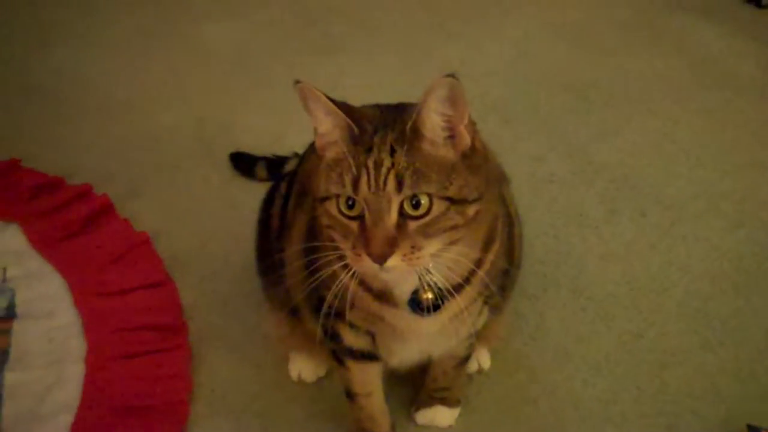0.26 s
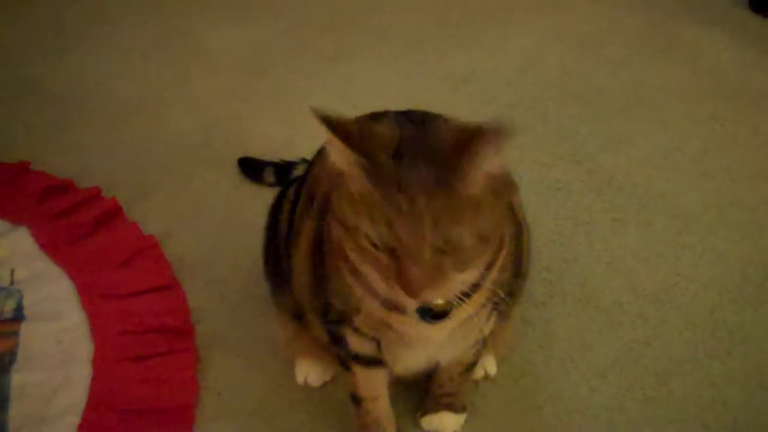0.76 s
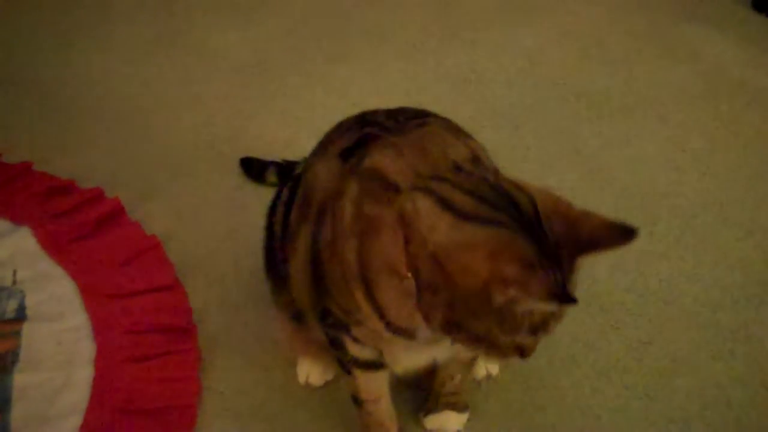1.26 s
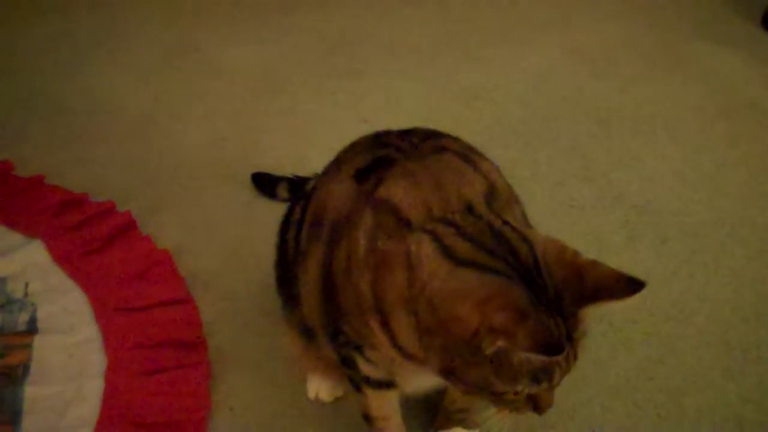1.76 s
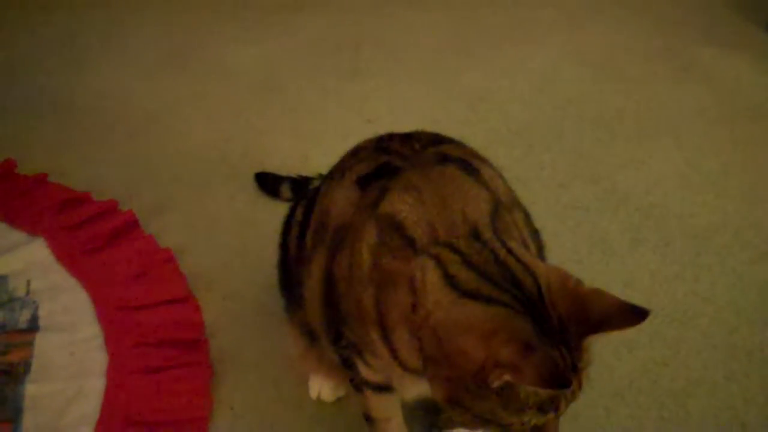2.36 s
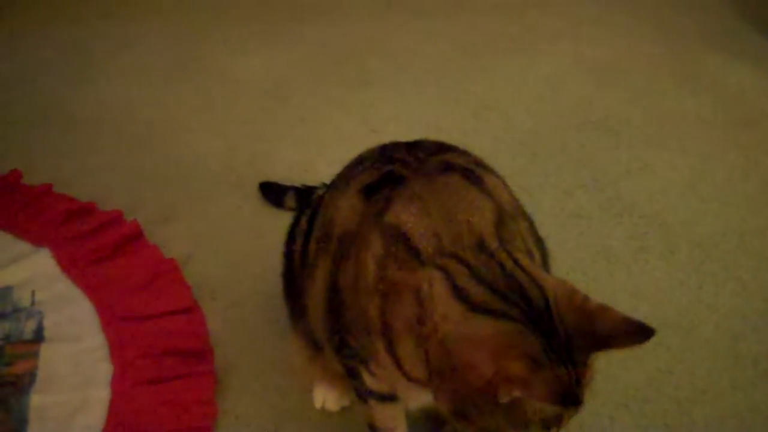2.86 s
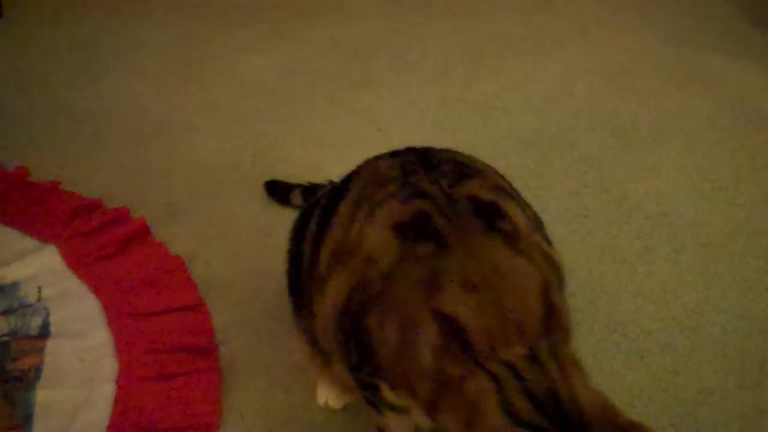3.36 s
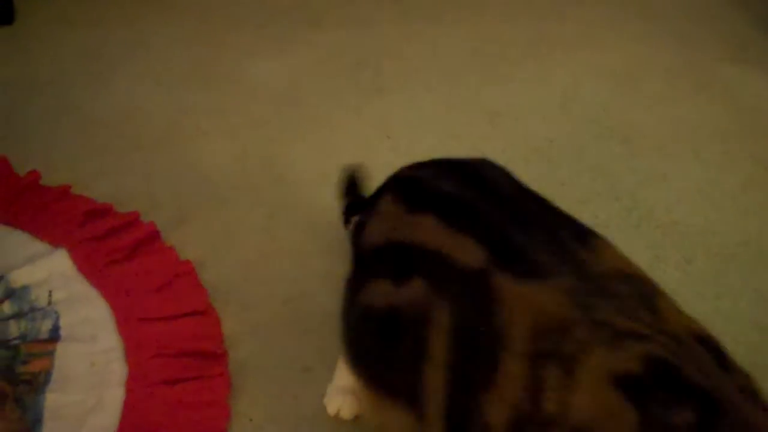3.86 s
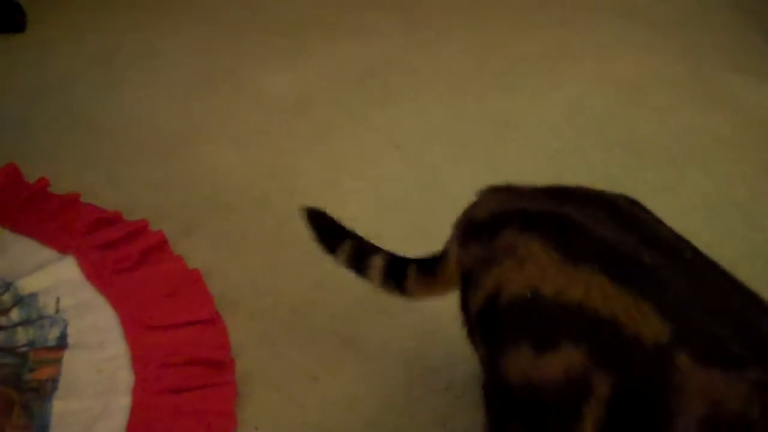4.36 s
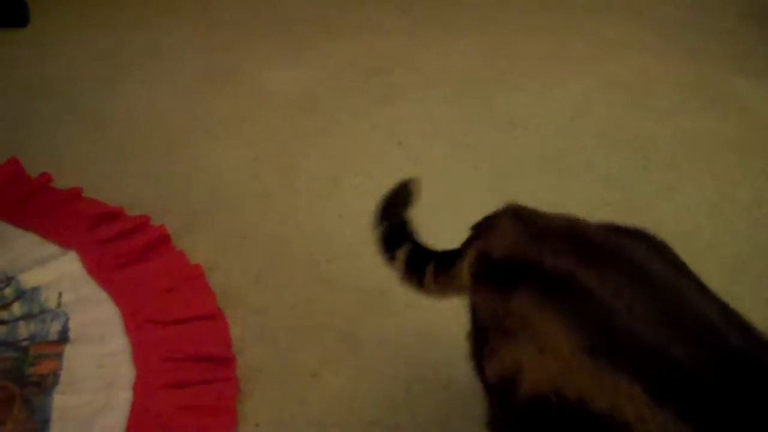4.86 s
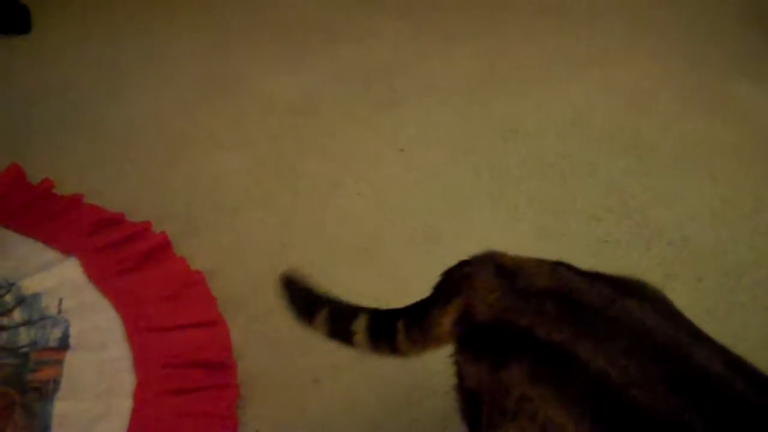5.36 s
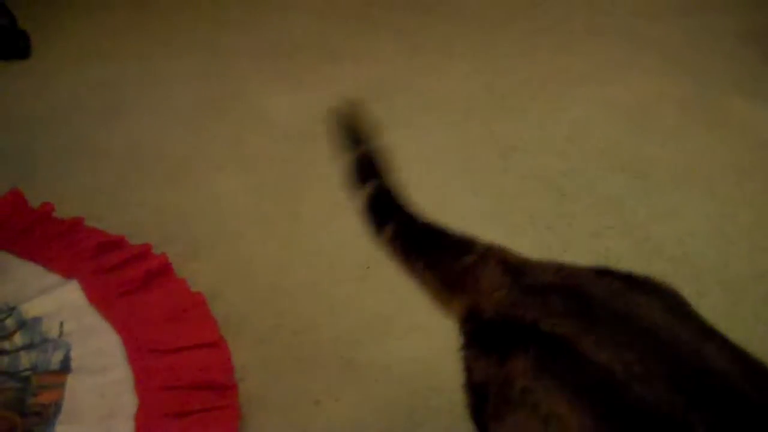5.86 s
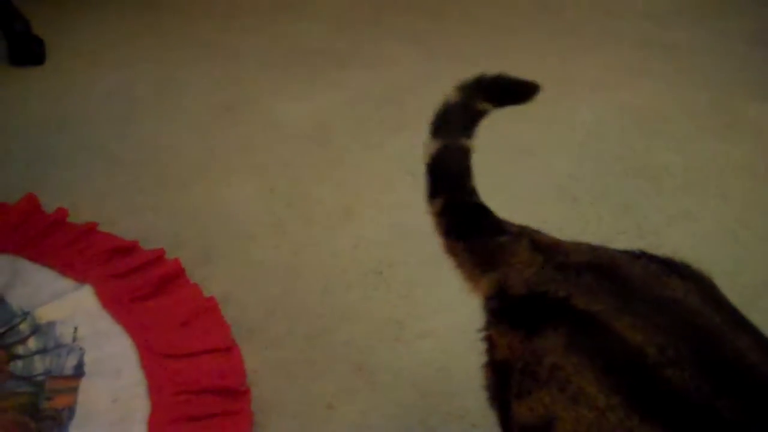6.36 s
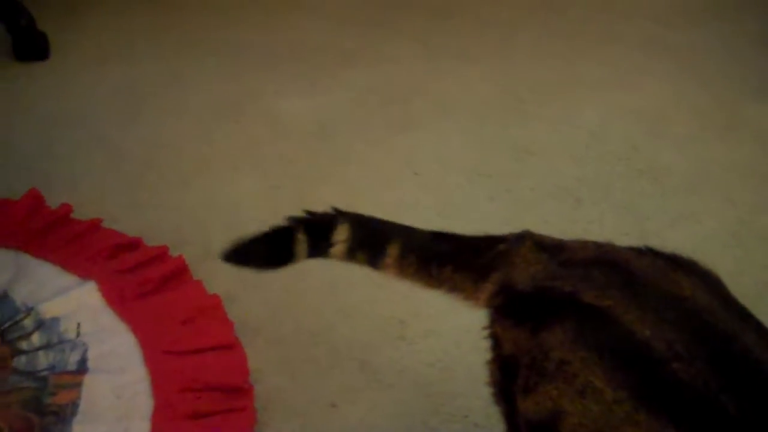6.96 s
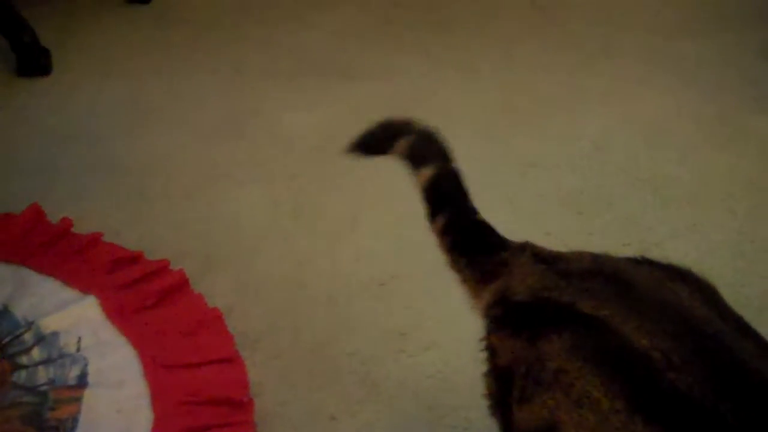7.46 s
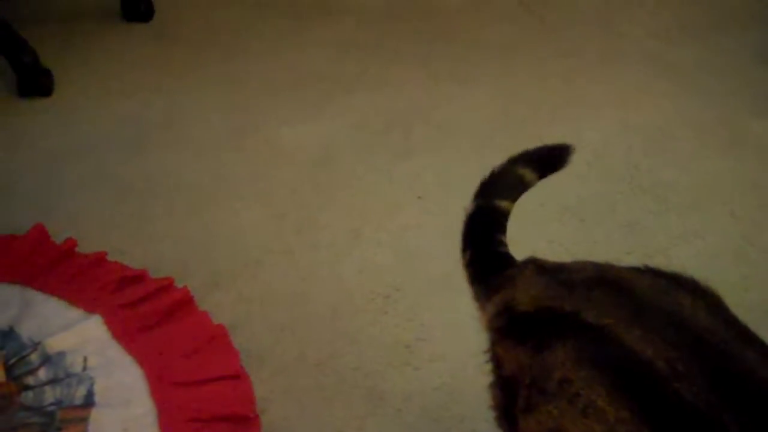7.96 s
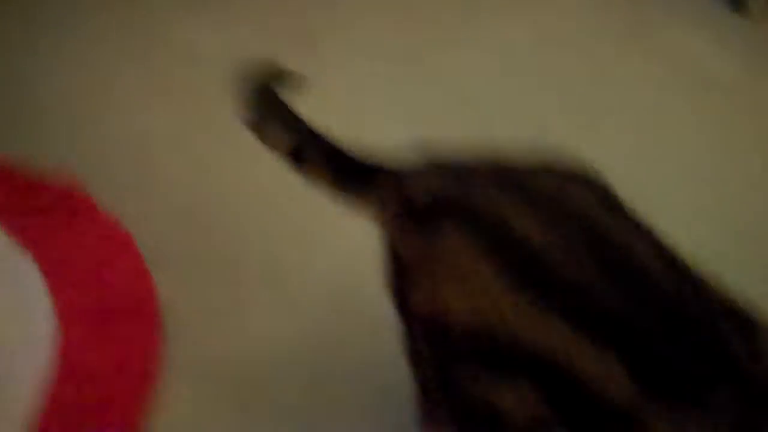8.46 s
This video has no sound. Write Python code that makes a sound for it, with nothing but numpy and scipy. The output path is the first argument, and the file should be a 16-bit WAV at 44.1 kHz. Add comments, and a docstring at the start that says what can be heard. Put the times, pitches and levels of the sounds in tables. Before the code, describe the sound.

A cat noses and paws at wrapping paper on a living-room carpet. Thin, sharp crackles come in irregular clusters over a soft sliding rustle, mixed with very short rips and a few light knocks on a cardboard box. The crackling is loudest a little before the middle and thins out at the end. The paper is close and to the left of the microphone, over faint hiss and hum.

```python
"""Cat in wrapping paper

A cat noses and paws at wrapping paper on a living-room carpet, just left of a small camera.
Creases buckle and snap over a sliding rustle and short rips; paws knock a cardboard box; the carpet
gives dull rubs. The room answers briefly over room tone, hiss and mains hum. Each of the two
microphone ports has its own resonance; the loudest snaps clip."""
import sys
import numpy as np
from scipy import signal
from scipy.fft import rfft, irfft
from scipy.io import wavfile

SR = 44100
rng = np.random.default_rng(int(sys.argv[2]) if len(sys.argv) > 2 else 0)


def master_out(mix):
    """Clip the mix to full scale and print it as 16-bit PCM to the path in sys.argv[1]."""
    frames = np.transpose(np.atleast_2d(mix))
    ceiling = np.clip(frames, -1, 1)
    pcm = np.round(ceiling * 32767).astype(np.int16)
    wavfile.write(sys.argv[1], SR, pcm)


N = 383669
TIME_S = np.arange(N) / SR
PAN_DB = 14  # left minus right


def undb(db):
    """dB to gain."""
    return 10 ** (np.asarray(db) / 20)


def unit(x):
    """Scale to rms 1."""
    return x / np.sqrt(np.mean(x ** 2))


def peak(x):
    """Largest magnitude of each row."""
    return np.abs(x).max(axis=-1, keepdims=True)


def band(x, lo_hz, hi_hz):
    """Band-pass, 12 dB/octave each side."""
    return signal.sosfilt(signal.butter(2, [lo_hz, hi_hz], "bandpass", fs=SR, output="sos"), x)


def lowpass(x, hz, order=2):
    """Gentle treble roll-off."""
    return signal.lfilter(*signal.butter(order, hz, fs=SR), x)


def top_cut(x, hz):
    """Steep low-pass."""
    return signal.sosfilt(signal.ellip(10, .2, 80, hz, fs=SR, output="sos"), x)


def ring(hz, t60_s, size=SR // 8):
    """One damped mode."""
    t = np.arange(size) / SR
    return np.sin(2 * np.pi * hz * t) * np.exp(-np.log(1000) * t / t60_s)


def add(track, start_s, sound):
    """Mix a sound into the track."""
    i = int(start_s * SR)
    track[..., i:i + sound.shape[-1]] += sound[..., :N - i]


def colour(noise, points):
    """Filter by (frequency [Hz], gain [dB]) points."""
    hz, db = np.transpose(points)
    bins_hz = np.fft.rfftfreq(N, 1 / SR) + 1
    return irfft(rfft(noise) * undb(np.interp(np.log(bins_hz), np.log(hz), db)), N)


# Port resonances, left then right: (frequency [Hz], Q)
PORTS = [(7790, 5.25), (6240, 6.2)]


def port(x, hz, q):
    """Hole in front of a capsule: flat bass, a resonance, falling treble."""
    w = 2 * SR * np.tan(np.pi * hz / SR)
    return signal.lfilter(*signal.bilinear([w * w], [1, w / q, w * w], SR), x)


# Hum partials: (frequency [Hz], level [dB])
HUM_PARTIALS = [(120, -66.5), (961, -75.5)]
# Hum envelope: (time [s], gain [dB])
HUM_SAG = [(0, 1), (1.4, -1), (2.2, -3.5), (2.7, -7), (3.8, -13), (5.1, -6.5), (5.6, -3.5), (6.4, -1.5),
           (8.7, 1.5)]


def hum():
    """Mains hum; the level sags and returns."""
    tones = sum(np.sqrt(2) * undb(db) * np.sin(2 * np.pi * hz * TIME_S) for hz, db in HUM_PARTIALS)
    return tones * undb(np.interp(TIME_S, *np.transpose(HUM_SAG)))


# Noise floor spectrum: (frequency [Hz], relative density [dB])
AIR_SPECTRUM = [(15, -38), (25, 4.5), (70, -1), (122, -1), (168, 1.5), (330, -1.5), (599, -3.5),
                (741, -5.5), (966, -3.5), (1130, -6), (2640, -14), (5840, -13), (7420, -19), (14000, -18.5)]
# Noise floor balance: (frequency [Hz], left minus right [dB])
AIR_BALANCE = [(60, 1), (110, 5.5), (200, 6.5), (370, 8.0), (680, 7.5), (1260, 6), (2310, -0.5), (4250, -1),
               (7810, 1), (14400, 2)]
# Port coherence: (frequency [Hz], common power [0-1])
AIR_COHERENCE = [(40, 0.058), (130, 0.5), (500, 0.54), (1500, 0.21), (4000, 0.022)]


def air(noise_db=-58):
    """Room tone and capsule hiss, partly common to both sides, plus the hum."""
    common, *own = rng.standard_normal((3, N))
    hz, share = np.transpose(AIR_COHERENCE)
    alike = colour(common, np.transpose([hz, 10 * np.log10(share)]))
    apart = colour(np.array(own), np.transpose([hz, 10 * np.log10(1 - share)]))
    floor = unit(colour(alike + apart, AIR_SPECTRUM)) * undb(noise_db) + hum()
    return np.array([colour(x, np.multiply(AIR_BALANCE, [1, side])) for x, side in zip(floor, (.5, -.5))])


def grains(rate_per_s, spread_db):
    """Tiny creases of random size and timing, as a fine and a coarse band."""
    hits = rng.random(N) < rate_per_s / SR
    clicks = hits * rng.standard_normal(N)
    clicks *= undb(spread_db * np.minimum(rng.exponential(1, N), 5.5))
    fine = band(clicks, 4800, 19000)
    coarse = band(np.roll(clicks, N // 2), 1570, 5670)
    return fine / np.std(port(fine, *PORTS[0])), unit(coarse)


# Sliding paper: (time [s], fine level [dB], coarse level [dB])
RUSTLE = [(0, -42.5, -55.5), (.12, -37.5, -50), (.2, -40.5, -52), (.25, -60, -64), (.31, -41, -53.5),
          (.42, -38, -54), (.65, -33.5, -54), (.8, -47, -59.5), (.92, -40, -54.5), (1.15, -37.5, -49),
          (1.3, -43, -57), (1.36, -39.5, -57), (1.41, -35.5, -51.5), (1.44, -41, -55), (1.46, -49, -77),
          (1.52, -35, -48), (1.6, -50, -56), (1.7, -52.5, -60.5), (2.0, -38.5, -49), (2.13, -27, -42),
          (2.35, -42.5, -53.5), (2.7, -41.5, -51.5), (2.92, -56, -61.5), (3.05, -47, -56),
          (3.4, -48, -63.5), (3.5, -37, -51), (3.68, -51, -53.5), (3.9, -37.5, -52), (4.02, -40, -47.5),
          (4.2, -35, -46.5), (4.4, -42, -50), (4.63, -56, -58), (4.82, -52, -54.5), (4.93, -41.5, -54),
          (5.0, -38.5, -50.5), (5.04, -41.5, -54), (5.13, -49.5, -58), (5.3, -48, -50), (5.41, -47, -63),
          (5.46, -41.5, -55), (5.5, -49, -60), (5.54, -36.5, -52), (5.6, -37.5, -47), (5.7, -38.5, -51),
          (5.85, -46.5, -60.5), (6.12, -55.5, -63), (6.5, -51, -61), (6.62, -36.5, -55.5), (6.8, -55, -60),
          (6.9, -42, -48.5), (7.02, -52.5, -60), (7.07, -49, -59), (7.09, -43.5, -51.5),
          (7.15, -43.5, -51.5), (7.2, -40.5, -47.5), (7.245, -35.5, -50.5), (7.27, -47, -61),
          (7.33, -48.5, -63), (7.5, -37, -49.5), (7.72, -51, -62), (8.3, -52, -60.5), (8.5, -55, -61),
          (8.6, -52.5, -58), (8.7, -47, -58)]


def rustle(flicker_db=1.95, crackle_db=-12):
    """Paper slides on paper: dense creases fuse into a flickering hiss under sparse crackles."""
    time_s, fine_db, coarse_db = np.transpose(RUSTLE)
    fine, coarse = grains(rate_per_s=9000, spread_db=1.5)
    fine_crackle, coarse_crackle = grains(rate_per_s=500, spread_db=3)
    fine = 0.56 * (fine + undb(crackle_db) * fine_crackle) * undb(np.interp(TIME_S, time_s, fine_db))
    coarse = 0.74 * (coarse + undb(crackle_db) * coarse_crackle)
    coarse *= undb(np.interp(TIME_S, time_s, coarse_db))
    flicker = unit(band(rng.standard_normal(N), 1.3, 41))
    return (fine + coarse) * undb(flicker_db * flicker)


def crack(noise, t_ms, decay_ms, level_db):
    """Burst of tiny cracks, the first hardest; short bursts are sharp, long ones mid-treble."""
    envelope = np.exp(-(t_ms / np.maximum(decay_ms, .03)) ** (1 + 0.43 * decay_ms))
    burst = band((noise + 2.44 * (t_ms == 0)) * envelope, 5020, 21700)
    smooth = np.clip(decay_ms, 0, 1)
    burst = (1 - smooth) * burst + smooth * band(burst, 5500, 11400)
    burst += undb(-6) * (1 - smooth) * band(burst, 11800, 22000)
    return burst * undb(level_db) / peak(port(burst, *PORTS[0]))


def sheet_ring(hz, size, t60_cycles=13):
    """Three modes of a paper patch, spaced by its shape; a small patch radiates little bass."""
    lower_hz = 0.58 * hz * np.exp(0.15 * rng.standard_normal(hz.shape))
    upper_hz = 1.45 * hz * np.exp(0.24 * rng.standard_normal(hz.shape))
    t60_s = t60_cycles / hz
    modes = ring(hz, t60_s, size) - undb(-7.5) * ring(lower_hz, t60_s, size)
    modes += undb(-8.5) * ring(upper_hz, t60_s, size)
    return band(modes, 740, 9400)


# Buckling creases:
# (time [s], crack level [dB], ring pitch [Hz], ring level [dB], flap level [dB], crack decay [ms])
SNAPS = [(0.1049, -3, 4950, -47, -35, 0.23), (0.382, -13.5, 3450.0, -43, -47, 0.048),
         (0.423, -13, 3900.0, -22, -44, 0.21), (0.4368, -4, 3440, -22, -46, 0.22),
         (0.475, -10, 3660.0, -39, -52, 0.37), (0.4823, -14, 5240, -11, -46, 0.081),
         (0.5364, -2.5, 4170, -13, -50, 0.16), (0.5408, -1.5, 4290.0, -32, -34, 0.065),
         (0.548, -16, 4800, -37, -53, 0.22), (0.5673, -9.5, 2760.0, -31, -29, 0.21),
         (0.695, -14, 5190.0, -23, -50, 0.12), (0.7096, -14.5, 3680, -29, -49, 0.19),
         (0.9392, -8.5, 3300, -25, -50, 0.5), (1.0792, -9, 4170, -25, -48, 0.45),
         (1.091, -14, 5080.0, -31, -54, 0.43), (1.0988, -9.5, 5030, -13.5, -50, 0.075),
         (1.1339, -12, 4840, -16.5, -54, 0.18), (1.144, -8, 5060.0, -34.0, -53.0, 0.12),
         (1.214, -12.5, 3520, -17.5, -41, 0.19), (1.231, -14, 3080.0, -41, -54.0, 0.2),
         (1.283, -14.5, 3200, -23.5, -42, 0.55), (1.527, -7.5, 4330.0, -46, -57, 0.07),
         (1.584, -14.5, 3830, -31, -33, 0.31), (1.8293, -8, 3800, -22.5, -42, 0.092),
         (1.8494, -15, 5000, -25, -38.5, 0.16), (2.0966, 3.5, 3200, -12, -31, 0.021),
         (2.2036, -12, 2880, -20, -29, 0.24), (2.2175, -11.5, 2730.0, -33, -37, 0.082),
         (2.327, -17, 2500, -26, -55, 0.19), (2.506, -17.5, 3040.0, -34.5, -57, 0.097),
         (2.5955, 8.5, 3540, 2.5, -32, 0.47), (2.5993, -8, 2380, -22, -51, 0.8),
         (2.6046, -7, 2470, -23, -53, 0.66), (2.734, -17, 4340, -24.5, -39, 0.091),
         (3.0159, -3, 3300, -20.5, -37, 0.035), (3.0307, -12, 3030, -25, -36, 0.54),
         (3.0829, -20.5, 4630, -20.5, -32, 0.068), (3.158, -3.5, 3220, -12.5, -47, 0.18),
         (3.2497, -14, 4700, -18, -41, 0.03), (3.322, 1.5, 3430, -52, -32, 0.03),
         (3.445, -10, 3700, -19, -49, 0.046), (3.4571, -11, 3450.0, -37, -52.0, 0.1),
         (3.4642, 6.5, 5160, -1.5, -36, 4), (3.4722, -6, 5190.0, -19, -50, 0.1),
         (3.4815, -7, 4800, -14, -50, 0.19), (3.4977, -20, 5100, -18, -57, 0.05),
         (3.5125, -13, 4870.0, -40.0, -57, 0.13), (3.5314, 7.5, 4090, 8, -10.5, 0.61),
         (3.5478, -13, 3400, -16.5, -41, 0.18), (3.558, -5.5, 3290.0, -20, -39, 0.11),
         (3.611, -16, 3600, -26.5, -52, 0.075), (3.793, -37, 2820, -26, -50, 0.1),
         (3.846, -36, 2610, -30.5, -44, 0.1), (4.214, -28, 2740, -25.5, -48, 0.1),
         (4.298, -23, 2300, -27, -43, 0.1), (3.8016, -9, 4330, -6.5, -50, 1.2),
         (3.888, -18, 3280, -11.5, -26, 0.41), (3.971, -11, 3010.0, -27, -34, 0.059),
         (4, -3, 4630, -14.5, -34, 0.092), (4.0101, -16, 4520, -12, -29, 0.3),
         (4.0524, -4.5, 5100, -41, -52, 0.2), (4.061, -28, 4570.0, -24, -54, 0.4),
         (4.1603, -17, 2980, -9.5, -23, 0.1), (4.1614, -7.5, 4500, -4.5, -23, 0.043),
         (4.157, -30, 2800, -24, -35, 0.1), (4.2635, -3.5, 4650, -34, -42, 0.048),
         (4.3464, -17, 2850, -16.5, -40, 0.061), (4.3986, -22, 2930.0, -22.5, -53, 0.039),
         (4.4152, -19.5, 3360, -20, -52, 0.29), (4.512, -5.5, 2960, -25.5, -55, 0.035),
         (4.527, -14, 4330.0, -38, -60, 0.049), (4.731, -7, 4820.0, -12, -55, 0.05),
         (4.7358, -0.5, 4400, -7, -49, 0.082), (4.737, -16, 4500, -28, -55, 0.089),
         (4.853, -6.5, 5030, -11, -58, 0.29), (4.863, -1, 4880, -28, -61, 0.18),
         (5.0749, -19.5, 4520, -22, -47, 0.036), (5.1966, -34, 3950, -17, -30, 0.07),
         (5.214, -16, 4860, -15, -27, 0.081), (5.2524, -6.5, 3600, -16.5, -30, 0.022),
         (5.6144, -2, 3820, -10, -47, 0.24), (5.6604, -8, 3800, -8, -46, 0.082),
         (5.7044, -12, 3120.0, -39, -55, 0.3), (5.7362, -18, 3560, -16.5, -40, 0.05),
         (5.7578, -15.5, 4670, -23, -57, 0.22), (5.9876, -21, 4760.0, -25.5, -49, 0.05),
         (5.9983, 4.5, 3740, -10, -44, 0.16), (6.2315, -20, 5100.0, -19.5, -38.5, 0.17),
         (6.2879, -9, 5000, -17.5, -46, 0.45), (6.305, -8, 3120.0, -45, -49.0, 0.13),
         (6.4945, -10, 4530, -17.5, -55, 0.25), (6.6645, -15, 4870.0, -44.0, -51, 0.36),
         (6.86, -15, 3700.0, -28.5, -50.0, 0.72), (6.8835, 5.5, 4400, -29, -24, 0.45),
         (6.8918, -10, 3320, -26.5, -40, 0.51), (7.2864, -17, 5000, -14.5, -33, 0.035),
         (7.329, -8, 4400, -18, -44, 0.72), (7.4163, -15, 2620, -32, -55, 0.44),
         (7.4293, -14, 3250, -20, -51, 0.58), (7.4501, -6, 3600, -20, -31.5, 0.15),
         (7.4783, -15.5, 3470.0, -25.5, -39, 0.22), (7.5478, -30, 4500, -15, -39, 0.058),
         (7.5707, -2.5, 2860, -20.5, -34, 0.025), (7.868, -12, 3920, -24.5, -37, 0.63),
         (7.8712, -8.5, 2890.0, -39, -51.0, 0.4), (7.9841, -18.5, 2330, -23.5, -29, 0.65),
         (8.1444, -14, 3840, -25.5, -35.5, 0.33), (0.101, -28, 4280, -25, -53, 0.05),
         (0.107, -17, 3880, -21, -37, 0.13), (0.114, -27, 4070, -29, -32, 0.17),
         (0.1285, -19, 3580, -34, -47, 0.14), (0.1367, -29, 3830, -32, -50, 0.09),
         (0.1544, -19.5, 3380, -37, -50, 0.05), (0.1729, -23, 4070, -26, -55, 0.2),
         (0.2914, -20, 4120, -37, -59, 0.13), (0.297, -24, 4530, -29, -58, 0.14),
         (0.3577, -19, 4390, -40, -57, 0.053), (0.3947, -14.5, 3320, -40, -54, 0.28),
         (0.4139, -20, 3220, -32, -56, 0.073), (0.4197, -16, 3900, -20.5, -43, 0.05),
         (0.4338, -16, 3400, -32, -46, 0.19), (0.5176, -17, 3870, -44, -61, 0.27),
         (0.5223, -24, 4420, -45, -56, 0.21), (0.6216, -18, 3950, -44, -58, 0.08),
         (0.643, -35, 4490, -48, -49, 0.13), (0.6517, -29, 3800, -39, -54, 0.03),
         (0.6573, -16, 4020, -38, -56, 0.26), (0.6667, -34, 4360, -46, -59, 0.16),
         (0.6903, -19, 3400, -47, -62, 0.16), (0.8028, -30, 3890, -47, -57, 0.11),
         (0.8606, -18.5, 4200, -44, -60, 0.21), (1.0678, -23, 3970, -25, -59, 0.13),
         (1.1108, -22, 4560, -19, -49, 0.67), (1.1168, -19, 4790, -32, -58, 0.03),
         (1.152, -22, 4590, -28, -49, 0.03), (1.191, -24, 3580, -25, -40, 0.56),
         (1.1962, -21, 4460, -24.5, -53, 0.3), (1.235, -15, 3410, -30, -55, 0.24),
         (1.286, -25, 3750, -31, -60, 0.14), (1.313, -27, 4730, -47, -61, 0.03),
         (1.5571, -23, 4150, -30, -38, 0.25), (1.57, -20, 4300, -18, -43, 0.098),
         (1.5813, -17, 3750, -29, -39, 0.72), (1.9064, -18.5, 3780, -28, -36.5, 0.17),
         (1.9598, -33, 3300, -28, -59, 0.21), (2.0426, -27, 4100, -21.5, -37, 0.55),
         (2.4237, -19, 3050, -34, -56, 0.23), (2.4342, -21, 3980, -27, -56, 0.03),
         (2.61, -13, 3970, -32, -50, 0.41), (2.6157, -15, 4260, -30, -54, 0.25),
         (2.6198, -8.5, 2860, -21, -54, 0.22), (2.754, -24, 4120, -40, -61, 0.31),
         (3.1616, -18, 4220, -40, -53, 2.4), (3.1788, -20, 4260, -33, -45, 0.19),
         (3.2797, -26, 4470, -40, -43, 0.32), (3.326, -19, 4280, -42, -61, 0.79),
         (3.3363, -31, 3920, -51, -58, 0.49), (3.4617, -10, 4100, -27, -33, 0.41),
         (3.477, -18, 4760, -28, -60, 0.46), (3.4927, -21, 4310, -34, -58, 0.09),
         (3.5094, -20, 3840, -41, -62, 0.11), (3.549, -9, 3860, -18, -35, 0.075),
         (3.5522, -15, 3790, -22, -44, 0.09), (3.806, -29, 3810, -43, -63, 0.71),
         (3.9541, -26, 4200, -28, -42, 0.03), (4.0041, -15, 3970, -36, -28.5, 0.5),
         (4.2669, -16, 3950, -25, -52, 0.73), (4.5043, -23, 3660, -41, -59, 0.32),
         (4.704, -30, 4290, -36, -55, 0.027), (4.7391, -33, 3660, -41, -49, 0.81),
         (5.6965, -24, 3950, -37, -58, 0.03), (5.7012, -17, 3770, -37, -59, 0.19),
         (5.7075, -24, 3400, -34, -56, 0.25), (5.7133, -27, 3950, -38, -62, 0.25),
         (5.852, -20.5, 4240, -28, -61, 0.28), (5.8691, -23, 3620, -48, -62, 0.13),
         (5.898, -23, 4170, -58, -65, 0.11), (6.2933, -25, 4500, -41.5, -53, 0.32),
         (6.321, -28, 3840, -35, -60, 0.03), (6.43, -29, 3800, -39, -45, 0.27),
         (6.4818, -29, 4210, -40, -54, 0.84), (6.4859, -13, 4120, -36, -60, 0.13),
         (6.5029, -10.5, 4320, -41, -56, 0.11), (6.5345, -36, 3450, -28.5, -61, 0.17),
         (6.8542, -21, 4260, -43, -58, 0.09), (1.478, -27, 4200, -42, -58, 0.036),
         (0.24, -35, 4000, -50, -60, 0.05), (7.2198, -29, 4250, -33, -57, 0.03),
         (7.4448, -17, 3060, -35, -50, 0.11), (7.5374, -18, 4680, -41, -56, 0.06),
         (7.6064, -36, 4080, -49, -62, 0.03), (7.6458, -26, 4360, -33.5, -41, 0.035),
         (7.7872, -21, 4800, -27.5, -52, 0.19), (8.2903, -24, 3860, -32.5, -61, 0.09),
         (8.372, -37, 3670, -59, -61, 0.03)]


def snaps(size=512, room_db=-9, flap_room_db=-11.5, wide_above_db=4.5):
    """A crease flips: crack, sheet ring and dull flap. Returns left, right, room send."""
    time_s, crack_db, ring_hz, ring_db, flap_db, decay_ms = np.transpose(SNAPS)[..., None]
    t_ms = np.arange(size) * 1000 / SR
    fine, dull = rng.standard_normal((len(SNAPS), 2, size)).transpose(1, 0, 2)
    cracks = crack(fine, t_ms, decay_ms, crack_db)
    sheet = undb(ring_db) * sheet_ring(ring_hz, size)
    flap = band(dull * np.exp(-t_ms), 314, 1920)
    flap *= undb(flap_db) / peak(flap)
    # The rest of the sheet shivers, unpitched, into the room.
    shiver = band(dull * np.exp(-t_ms / 0.17), 1240, 3800)
    shiver *= undb(ring_db - 7) / peak(shiver)
    pan_db = 18 + 2.5 * rng.standard_normal(len(SNAPS))
    # Loud snaps move a large patch and reach both ports more evenly.
    pan_db -= 3.2 * np.maximum(crack_db[:, 0] - wide_above_db, 0)
    out = np.zeros((3, N))
    for k, start_s in enumerate(time_s[:, 0]):
        add(out, start_s, cracks[k] * undb([[0], [-pan_db[k]], [room_db]]))
        add(out[:2], start_s, sheet[k] * undb([[0], [-pan_db[k]]]))
        add(out[2], start_s, shiver[k] * undb(room_db))
        add(out, start_s, flap[k] * undb([[0], [-PAN_DB], [flap_room_db]]))
    return lowpass(out, 14500)


# Cardboard box modes: (frequency [Hz], level [dB], free T60 [s])
BOX_MODES = [(222, -7.5, 0.16), (307, -1, 0.036), (422, 0, 0.048), (687, -6, 0.056), (833, -8.5, 0.068),
             (1128, -5, 0.08), (1418, 1.5, 0.047), (2040, 2, 0.021)]
# Paw hits: (time [s], level [dB], pitch [Hz], paw damping [0-1])
KNOCKS = [(0.107, -21, 417, 0.3), (1.58, -33, 376, 0.68), (3.531, -12, 1000, 1), (3.886, -32, 1160, 0.7),
          (4.004, -46, 1510, 0.2), (5.999, -28, 1320, 0.75), (7.567, -35, 960, 0.77),
          (8.142, -25.5, 1610, 0.74)]


def knocks(falloff_db_per_octave=8.2):
    """A paw hits the box; modes near the pitch of the struck spot ring most."""
    out = np.zeros(N)
    for start_s, level_db, pitch_hz, damping in KNOCKS:
        free = 1 - min(damping, .9)
        box = 0
        for k, (hz, mode_db, t60_s) in enumerate(BOX_MODES):
            gain = undb(mode_db - falloff_db_per_octave * abs(np.log2(hz / pitch_hz)))
            box += (-1) ** k * gain * ring(hz, t60_s * free)
        add(out, start_s, undb(level_db) * box / peak(box))
    return out


# Short tears: (time [s], length [s], fine level [dB], coarse level [dB])
RIPS = [(0.38, 0.073, -50, -45.5), (0.465, 0.02, -27.5, -50), (0.529, 0.047, -41, -37),
        (1.063, 0.08, -33.5, -48), (1.505, 0.03, -32.5, -56), (2.279, 0.049, -34.5, -39.5),
        (2.817, 0.073, -41.5, -58), (3.769, 0.017, -40.5, -58), (3.87, 0.059, -33, -41),
        (5.337, 0.043, -41, -50), (6.21, 0.086, -40, -49), (6.27, 0.043, -30, -56),
        (6.458, 0.054, -26.5, -46), (6.856, 0.035, -33, -54), (7.409, 0.031, -24, -39.5),
        (7.775, 0.059, -45, -52.5), (7.997, 0.019, -37.5, -45), (4.273, 0.058, -37, -44.5),
        (3.167, 0.057, -40.5, -46), (2.703, 0.067, -47, -50)]


def rips():
    """The sheet gives way: a dense crackle swells and stops."""
    fine, coarse = grains(rate_per_s=3000, spread_db=2.8)
    out = np.zeros(N)
    for start_s, length_s, fine_db, coarse_db in RIPS:
        progress = np.arange(0, 1, 1 / (length_s * SR))
        swell = np.sqrt(np.sin(np.pi * progress ** 1.02))
        span = int(start_s * SR) + np.arange(len(swell))
        out[span] += swell * (undb(fine_db) * fine[span] + undb(coarse_db) * coarse[span])
    return out


# Carpet rubs: (time [s], length [s], level [dB])
RUBS = [(7.5, 0.057, -47.5), (7.12, 0.1, -52.5), (8.53, 0.18, -59), (1.8, 0.043, -46)]


def rubs():
    """Friction on the carpet: a dull scuff swells and fades."""
    scuff = unit(band(rng.standard_normal(N), 600, 1500))
    out = np.zeros(N)
    for start_s, length_s, level_db in RUBS:
        i = int(start_s * SR)
        swell = np.sin(np.pi * np.arange(0, 1, 1 / (length_s * SR)))[:N - i]
        add(out, start_s, undb(level_db) * swell * scuff[i:i + len(swell)])
    return out


def room(send, low_t60_s=0.16, mid_t60_s=0.15, high_t60_s=0.098, build_s=0.027):
    """Echoes thicken into a short stereo tail; the treble dies first."""
    t = np.arange(SR // 2) / SR
    density = np.clip(t / build_s, .22, 1) ** 2
    echoes = rng.standard_normal((2, len(t))) / np.sqrt(density)
    echoes *= (rng.random(echoes.shape) < density) & (t > .001)
    fade = np.exp(-np.log(1000) * t)
    tail = band(echoes, 170, 1550) * fade ** (1 / low_t60_s)
    tail += undb(0.5) * band(echoes, 1940, 4400) * fade ** (1 / mid_t60_s)
    tail += band(echoes, 9400, 22000) * fade ** (1 / high_t60_s)
    tail /= np.linalg.norm(tail, axis=1, keepdims=True)
    return signal.fftconvolve(send[None], tail, axes=1)[:, :N]


def sparkle(x):
    """Thin glossy paper: a narrow lift near 12 kHz."""
    return x + undb(-1.5) * band(x, 12160, 12300)


def scene(soft_room_db=-9, knock_room_db=-6.5, soft_top_hz=14200, shadow_hz=8260, lag_samples=2):
    """Paper, box, carpet and echoes enter two ports, over the noise floor."""
    sharp = sparkle(snaps())
    soft = (rips() + rustle() + rubs()) * undb([[0], [-PAN_DB], [soft_room_db]])
    soft += knocks() * undb([[0], [-PAN_DB], [knock_room_db]])
    soft = sparkle(soft)
    echoes = room(sharp[2] + soft[2]) * undb([[0], [-7.5]])
    left, right = sharp[:2] + top_cut(soft[:2] + echoes, soft_top_hz)
    # The camera body shades the right port: later, duller.
    right = lowpass(np.roll(right, lag_samples), shadow_hz)
    return np.array([port(left, *PORTS[0]), port(right, *PORTS[1])]) + top_cut(air(), soft_top_hz)


def record(dry, clip_level=.92, bass_loss=0.53, bass_hz=490, top_hz=16400):
    """Loudest snaps clip, bass is thinned, treble ends near 16 kHz."""
    clipped = np.clip(dry, -clip_level, clip_level)
    thinned = clipped - bass_loss * lowpass(clipped, bass_hz, order=1)
    return top_cut(thinned, top_hz)


dry = scene()
out = record(dry)
master_out(out)
```